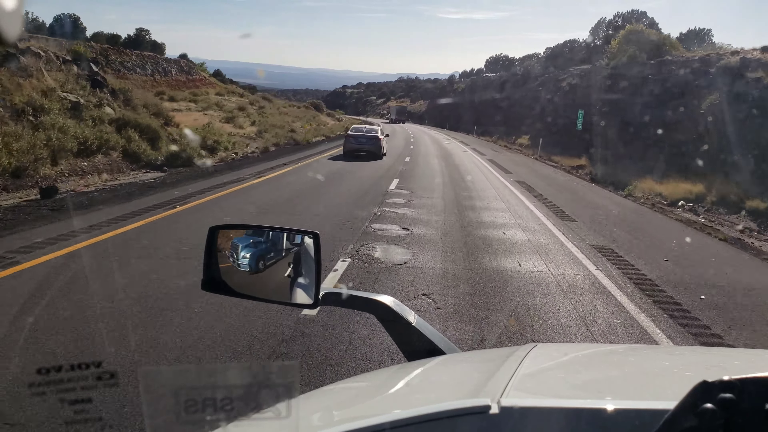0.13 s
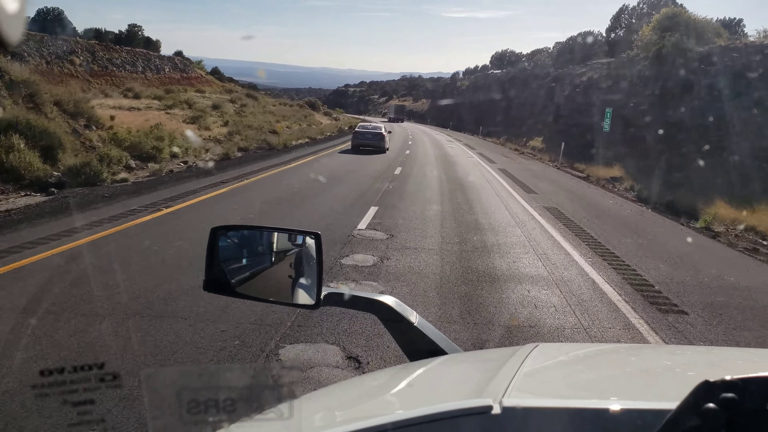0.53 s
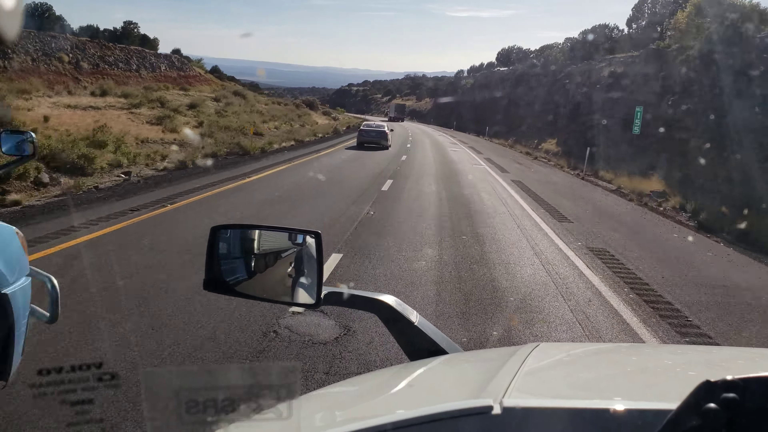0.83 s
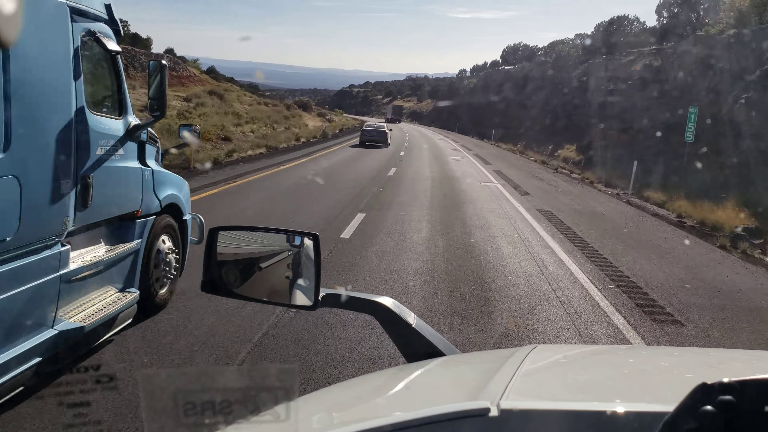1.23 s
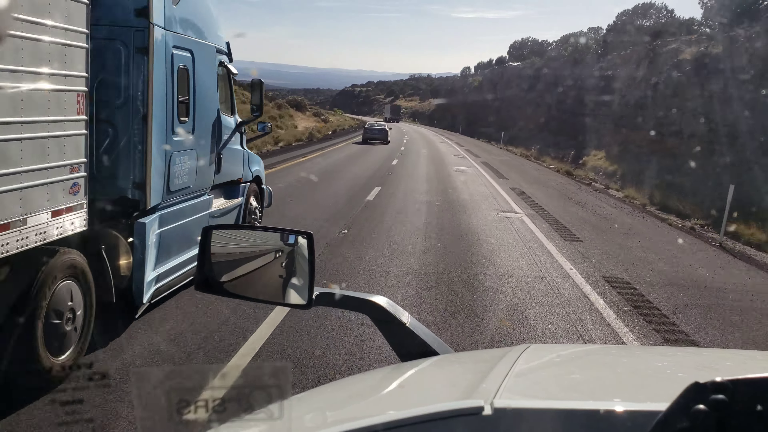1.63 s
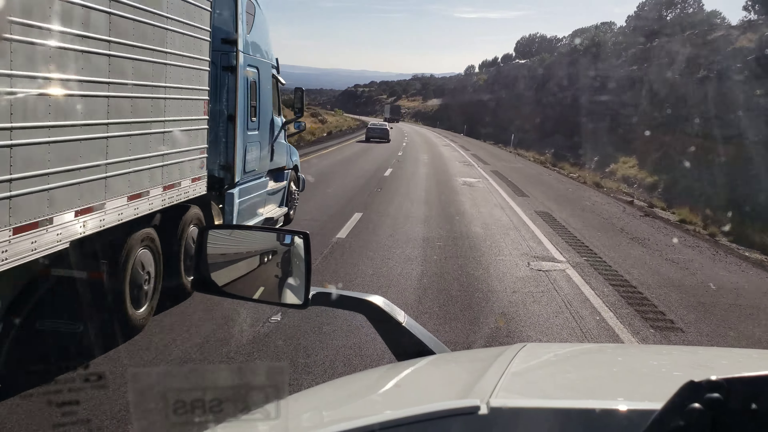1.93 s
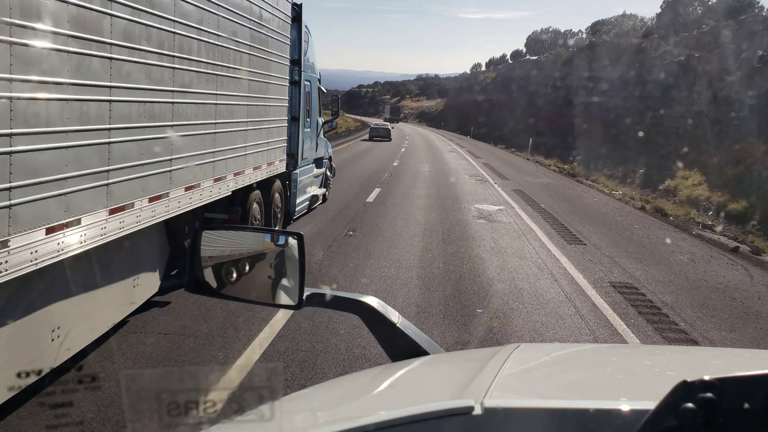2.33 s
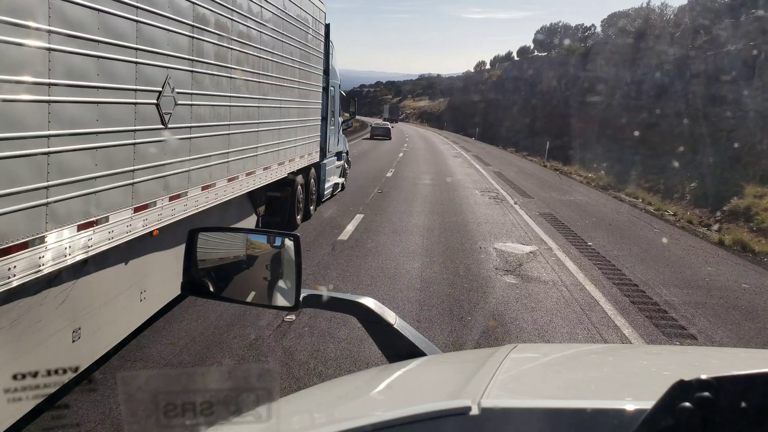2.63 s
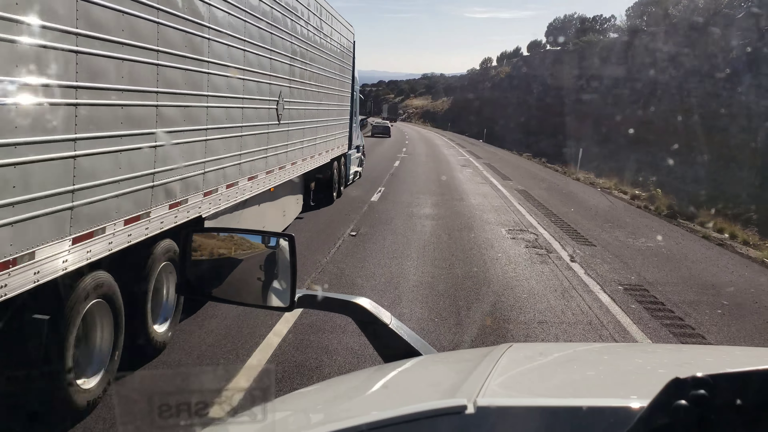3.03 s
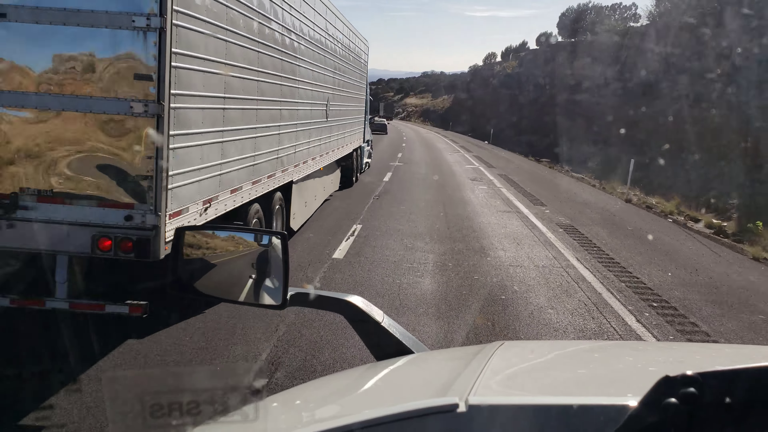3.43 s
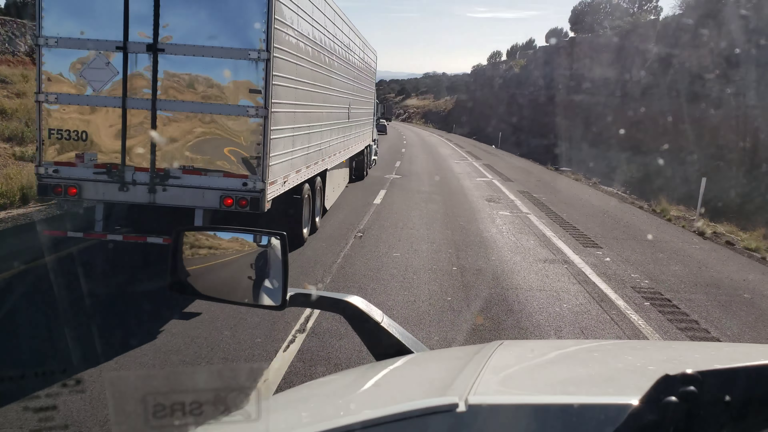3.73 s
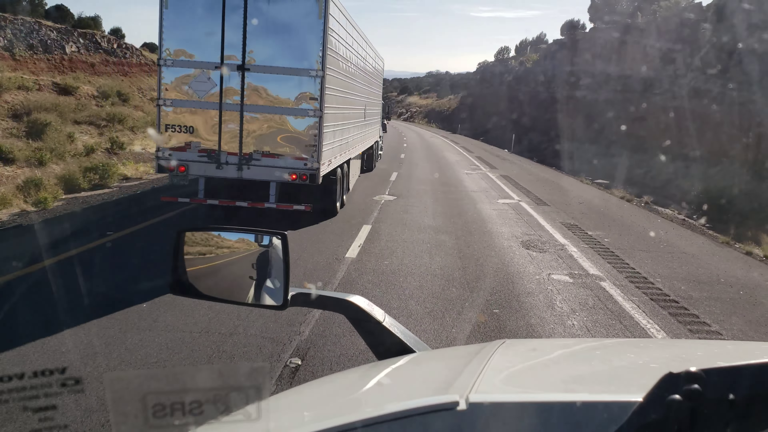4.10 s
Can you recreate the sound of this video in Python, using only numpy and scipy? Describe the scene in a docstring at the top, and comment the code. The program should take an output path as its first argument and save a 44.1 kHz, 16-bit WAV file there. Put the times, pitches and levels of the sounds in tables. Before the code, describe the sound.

A steady diesel drone and deep road rumble fill a truck cab, heard from inside, with a close turn signal clicking in a slightly limping rhythm. Early on, the tyres of a passing truck hum briefly to the left, followed by tiny trim squeaks. Later the floor rumbles over rough patches, and gusts of air grow stronger toward the end, hissing and buffeting the door amid light plastic taps.

```python
"""Inside the cab of a diesel truck holding its speed downhill on the engine brake.
The engine drones and booms in the cab's air resonance; tyres rumble, rough road shakes the floor.
The turn signal's contact goes tick-tock and rings the dash; loose trim taps and squeaks a little.
Another truck overtakes: its tyres hum, its wake hisses and flutters at the seals and slaps the door."""
import sys
import numpy as np
from scipy import signal
from scipy.fft import rfft, irfft
from scipy.io import wavfile

SR = 44100
rng = np.random.default_rng(int(sys.argv[2]) if len(sys.argv) > 2 else 0)


def digitize_waveform(pressure):
    """Quantize a signal to 16-bit integers and store it at the path in sys.argv[1].

    Rows of a 2-D input are taken as channels; values are limited to [-1, 1].
    """
    field = np.atleast_2d(pressure).T
    bounded = np.clip(field, -1, 1)
    quanta = np.round(bounded * 32767).astype(np.int16)
    wavfile.write(sys.argv[1], SR, quanta)


N = 188025
TIME_S, BIN_HZ = np.arange(N) / SR, np.fft.rfftfreq(N, 1 / SR)

# spectrum of click snaps and trim scuffs: (frequency [Hz], relative density [dB])
SNAP_SPECTRUM = [(500, -3), (1000, -5), (1500, -1), (2600, 6.5), (3600, -0.5), (5400, -5), (6300, -18),
                 (9000, -32), (11000, -22), (15000, -36)]


def engine(cycle_hz=11.254, boom_order=4, boom_db=-21, surge_half_s=0.042):
    """Engine and driveline drone; the order that meets the cab's air resonance booms."""
    # (multiple of the cycle rate, rms level [dB])
    engine_orders = [(7, -37), (8, -40), (12, -36), (16, -40.5), (17, -50), (18, -44.5)]
    # road and air jolts swell or sag the boom: (time [s], gain [dB])
    surges = [(.14, 2), (.83, 3.5), (2.67, 4), (3.85, -5), (3.97, 6.5)]
    # (time [s], shaft rate [Hz])
    shaft_speed = [(0, 57.66), (.6, 57.24), (1.4, 57.13), (2.3, 56.42), (3.3, 55.8), (4.26, 56.23)]
    # (multiple of the shaft rate, rms level [dB])
    shaft_orders = [(1, -31), (2, -31.5), (5, -42.5)]
    rate_hz = np.full(N, cycle_hz)
    shaft_hz = np.interp(TIME_S, *np.transpose(shaft_speed))
    surge_db = sum(db * bell(s, surge_half_s) for s, db in surges)
    boom = hum(rate_hz, [(boom_order, boom_db + surge_db)], flutter_db=0.6, wander_rad=0.31)
    drone = hum(rate_hz, engine_orders, flutter_db=3, wander_rad=0.21)
    driveline = hum(shaft_hz, shaft_orders, flutter_db=0, wander_rad=0.3)
    return (boom + drone + driveline) * pan(0.63)


def road(rumble_db=-23.5, rush_db=-45, bump_db=0.65, wall_cutoff_hz=1700):
    """Tyre rumble through the cab walls, road-driven cab resonances, steady air rush."""
    # (frequency [Hz], relative density [dB])
    rumble_spectrum = [(20, -9.5), (32, -13), (41, -6), (60, -2.5), (90, 2), (125, -6), (150, -5),
                       (190, -2.5), (225, -7), (265, -13), (370, -18), (550, -16), (900, -25), (1500, -31)]
    rush_spectrum = [(700, -1), (1300, 7), (1900, 1.5), (2800, 1.5), (3800, -2.5), (5000, -10.5),
                     (6500, -18), (8500, -21.5), (11000, -35), (14500, -20)]
    # (frequency [Hz], right minus left [dB])
    balance = [(80, 2), (200, -0.5), (340, -3.5), (520, 0), (900, 2.5), (1400, -0.5)]
    # (frequency [Hz], width [Hz], rms level [dB])
    cab_modes = [(280.6, 22, -44), (348.6, 13, -45.5), (481.4, 15, -46.5), (1227, 215, -44.5)]
    walls = 1 / (1 + (BIN_HZ / wall_cutoff_hz) ** 6)
    lean = pan(on_bins(balance))
    rumble = cab_noise(from_db(on_bins(rumble_spectrum)) * walls * lean)
    rumble *= from_db(rumble_db + bump_db * drift(1.6))
    whines = sum(from_db(db) * cab_noise(resonance(hz, width) * lean) for hz, width, db in cab_modes)
    rush = from_db(rush_db) * cab_noise(from_db(on_bins(rush_spectrum)))
    return rumble + whines + rush


def floor():
    """Rough road shakes the floor's broad, dull resonance."""
    # (centre [s], rms level [dB], half length [s])
    rough_stretches = [(.75, -24.5, .22), (1.52, -29.5, 0.15), (2.69, -22.5, .08), (2.912, -19, 0.054),
                       (3.446, -25.5, 0.14), (3.87, -22.5, 0.15), (4.176, -21, 0.087)]
    shake = sum(from_db(db) * bell(s, half_s) for s, db, half_s in rough_stretches)
    return shake * cab_noise(resonance(centre_hz=70.2, width_hz=82) ** 2)


def turn_signal(first_s=0.1316, tock_gain_db=-3):
    """Lamp on (tick) and lamp off (tock) alternate in a limping rhythm."""
    # dash modes: (frequency [Hz], relative level [dB], right minus left [dB])
    tick_modes = [(614, -29.5, 7), (757, -26, 13.5), (898, -24.5, 4.5), (1085, -26, -2), (1898, -37, 14.5),
                  (2102, -28.5, 8.5), (2443, -30, 10), (2615, -24, -1), (3000, -50, 7), (2980, -56, 1),
                  (3276, -42, 6), (3470, -33, 3), (3700, -43, -1), (4140, -44, 10), (4530, -53.5, 1),
                  (4690, -47.5, 7), (4980, -55, 5), (5560, -45, 17), (7160, -52, 6), (8650, -58, 8),
                  (10100, -52.5, 11)]
    tock_modes = [(1070, -28.5, -3), (1210, -45, -1), (1740, -41.5, 8), (2030, -23.5, 5.5),
                  (2675, -14, 4.5), (2914, -33, -11), (2966, -25.5, -3), (3227, -36, -4), (3510, -25, 5),
                  (3750, -36, -10), (4330, -38, 3), (4480, -39, 9), (4950, -31.5, 3), (5120, -34, 5),
                  (5900, -50, 3), (10100, -48.5, 11), (10780, -56, 8), (11509, -52, 11)]
    # repeating round: (gap [s])
    gaps_s = (.32, .28, .36)
    times_s = first_s + np.cumsum([0, *np.tile(gaps_s, N // SR + 1)])
    times_s = times_s[times_s < N / SR]
    ticks = contact_clicks(times_s[::2], tick_modes, ring_rise_s=0.0037, lag_s=0.0022,
                           touch_db=-36, snap_db=-32, snap_rise_s=0.0083, crack_db=-60)
    tocks = contact_clicks(times_s[1::2], tock_modes, ring_rise_s=0.0034, lag_s=0.001408,
                           touch_db=-35, snap_db=-31, snap_rise_s=0.0088, crack_db=-49)
    return ticks + from_db(tock_gain_db) * tocks


def contact_clicks(times_s, modes, ring_rise_s, lag_s, touch_db, snap_db, snap_rise_s, crack_db):
    """One click, repeated: the contact touches lightly, then cracks, snaps and rings the dash."""
    t = np.arange(SR // 20) / SR
    lagged_s = t - lag_s
    contact = from_db(touch_db) * swell(t, rise_s=0.0011) + from_db(snap_db) * swell(t, snap_rise_s)
    click = cab_noise(from_db(on_bins(SNAP_SPECTRUM)))[:, :len(t)] * contact
    crack = cab_noise(resonance(centre_hz=12000, width_hz=4500))[:, :len(t)]
    click += from_db(crack_db) * crack * swell(lagged_s, rise_s=0.0027)
    ear_phase_rad = np.array([[-0.82], [0.82]])   # right ear is nearer
    for k, (hz, db, right_db) in enumerate(modes):
        ring = swell(lagged_s, ring_rise_s) * np.sin(2 * np.pi * hz * lagged_s + ear_phase_rad)
        click += (-1) ** k * from_db(db) * pan(right_db) * ring   # neighbouring modes swing oppositely
    impulses = np.zeros((1, N))
    impulses[0, (times_s * SR).astype(int)] = 1
    return signal.fftconvolve(impulses, click, axes=1)[:, :N]


def gusts(release_s=0.18):
    """Draught above calm in dB: each gust builds, holds and dies away."""
    # (start [s], attack [s], hold [s], gain [dB])
    gust_events = [(-.1, 0.083, .04, 3), (0.868, 0.042, 0.19, 2.5), (3.2, 0.1, .26, 3),
                   (3.795, 0.017, .5, 6), (3.87, 0.086, .3, 5)]
    gust_db = 0
    for start_s, attack_s, hold_s, db in gust_events:
        attack = np.clip((TIME_S - start_s) / attack_s, 0, 1)
        release = np.exp(-np.maximum(TIME_S - start_s - attack_s - hold_s, 0) / release_s)
        gust_db += db * attack * release
    return gust_db


def seals(gust_db, calm_db=-51, flutter_db=1.27, calm_spurts_per_s=6, spurt_power=2.3, spurt_db=-1.5):
    """Air leaks past the door seals in turbulent puffs; gusts bring more sharp spurts."""
    # hiss per ear: (frequency [Hz], relative density [dB])
    left_spectrum = [(1000, -3), (2200, 4), (4000, 10.5), (5200, 7.5), (6500, 4.5), (7600, 3), (8600, 0),
                     (10500, -1), (13000, 2.5), (15500, -5)]
    right_spectrum = [(1000, 4.5), (2200, 13), (4000, 10), (5000, 10), (5900, 8.5), (7200, 13.5),
                      (8600, -3.5), (10500, 1.5), (13500, 5.5), (15500, 4)]
    hiss = cab_noise(from_db([on_bins(left_spectrum), on_bins(right_spectrum)]))
    onsets = rng.random(N) < calm_spurts_per_s * from_db(spurt_power * gust_db) / SR
    spurt = swell(np.arange(SR // 50) / SR, rise_s=0.00053)
    spurts = signal.fftconvolve(onsets.astype(float), spurt)[:N]
    level_db = calm_db + gust_db + flutter_db * drift(35)
    return hiss * from_db(level_db) * (1 + from_db(spurt_db) * spurts)


def door(gust_db, calm_db=-45):
    """Gusts drum on the door panel with a dull roar; wake eddies slap it."""
    # (centre [s], rms level [dB], half length [s])
    wake_slaps = [(4.01, -33, 0.051), (4.26, -33, .04)]
    roar = from_db(calm_db + gust_db) * cab_noise(resonance(centre_hz=400, width_hz=400))
    slaps = sum(from_db(db) * bell(s, half_s) for s, db, half_s in wake_slaps)
    return roar + slaps * cab_noise(resonance(centre_hz=480, width_hz=490))


def overtaker(tyre_hz=402.4, fall_hz_per_s=7.04, pass_half_s=0.095):
    """The other truck's tyre hum at the left window swells with each axle and sinks in pitch."""
    # (passing time [s], rms level [dB])
    axles = [(1.0, -37.5), (1.29, -35)]
    pitch_hz = tyre_hz - fall_hz_per_s * (TIME_S - axles[0][0])
    nearness = sum(from_db(db) * bell(s, pass_half_s) for s, db in axles)
    return nearness * hum(pitch_hz, [(1, 0)], flutter_db=1.5, wander_rad=0.24) * pan(-2.7)


def trim_taps(width_share=0.19):
    """Loose plastic trim taps: a narrow ring over a broad scuff."""
    # (start [s], level [dB], ring [Hz], rise [s])
    taps = [(0.961, -47, 3950, .005), (0.971, -47, 12500, 0.0033), (3.277, -46, 12500, 0.002),
            (3.297, -39.5, 3885, 0.004), (3.372, -41.5, 4300, 0.0044), (3.459, -50, 12500, 0.0016),
            (3.808, -46, 12500, .003), (3.916, -40, 3900, .003), (3.935, -38.5, 10200, 0.0028),
            (3.937, -37, 6670, 0.0044), (3.977, -39, 12000, .003), (4.029, -33, 4080, 0.0025),
            (4.032, -34.5, 2270, .005), (4.054, -35, 12800, 0.0042), (4.092, -35, 4040, 0.0025)]
    scuff = cab_noise(from_db(on_bins(SNAP_SPECTRUM)))
    out = 0
    for start_s, db, hz, rise_s in taps:
        ring = cab_noise(resonance(hz, width_share * hz))
        out += from_db(db) * swell(TIME_S - start_s, rise_s) * (ring + scuff)
    return out


def trim_squeaks(sag_share=0.013, rasp_share=0.05):
    """Trim sticks and slips: short raspy chirps that sag in pitch."""
    # (peak time [s], rms level [dB], pitch [Hz], half length [s])
    chirps = [(1.335, -48, 4030, .005), (1.364, -45.5, 4120, 0.012), (1.463, -51, 4200, 0.014),
              (1.536, -48, 4020, 0.0076), (1.557, -50, 4250, 0.0097), (1.578, -43, 4060, .009)]
    out = 0
    for peak_s, db, hz, half_s in chirps:
        progress = np.clip((TIME_S - peak_s) / half_s, -6, 6)
        pitch_hz = hz * (1 - sag_share * progress + rasp_share * drift(700))
        phase = 2 * np.pi * np.cumsum(pitch_hz) / SR + rng.uniform(0, np.pi / 2, (2, 1))
        out += from_db(db) * np.exp(-progress ** 2) * np.sqrt(2) * np.sin(phase)
    return out


def cab_echoes(x, echo_db=-10, first_echo_s=0.00418, t60_s=0.085):
    """Adds dense, short reflections from glass and panels."""
    t = np.arange(SR // 6) / SR
    echoes = rng.standard_normal((2, len(t))) * from_db(-60 * t / t60_s) * (t > first_echo_s)
    echoes /= np.sqrt(np.sum(echoes ** 2, axis=1, keepdims=True))
    return x + from_db(echo_db) * signal.fftconvolve(x, echoes, axes=1)[:, :N]


def hum(rate_hz, partials, flutter_db, wander_rad):
    """Partials of a rotating part, each wavering on its own in level and phase."""
    angle = 2 * np.pi * np.cumsum(rate_hz) / SR
    out = 0
    for order, db in partials:
        phase = order * angle + rng.uniform(0, 2 * np.pi) + wander_rad * drift(3.8)
        out += from_db(db + flutter_db * drift(3.1)) * np.sin(phase)
    return np.sqrt(2) * out


def cab_noise(bin_gain):
    """Coloured stereo noise, rms 1, alike in both ears only in the bass."""
    # (frequency [Hz], left-right correlation)
    ear_correlation = [(40, 0.93), (130, 1), (300, 0.89), (430, 0.61), (620, -0.32), (850, 0.47),
                       (1100, -0.26), (1300, -0.54), (1700, -0.13), (4000, -0.034)]
    mid, side = rfft(rng.standard_normal((2, N)))
    alike = np.clip(on_bins(ear_correlation), -0.999, 0.999)
    ears = np.sqrt(1 + alike) * mid + np.sqrt(1 - alike) * side * [[1], [-1]]
    return rms_one(irfft(bin_gain * ears, N))


def drift(rate_hz):
    """Random wander below about rate_hz, rms 1."""
    return rms_one(irfft(rfft(rng.standard_normal(N)) / (1 + (BIN_HZ / rate_hz) ** 2), N))


def resonance(centre_hz, width_hz):
    """Gain of a resonance per FFT bin."""
    return 1 / (1 + (2 * (BIN_HZ - centre_hz) / width_hz) ** 2)


def on_bins(points):
    """Table interpolated over log frequency, per FFT bin."""
    hz, value = np.transpose(points)
    return np.interp(np.log(BIN_HZ + 1e-9), np.log(hz), value)


def swell(t, rise_s):
    """Envelope: reaches 1 at rise_s, then decays."""
    u = np.maximum(t, 0) / rise_s
    return (u * np.exp(1 - u)) ** 2


def bell(centre_s, half_s):
    """Gaussian envelope, peak 1."""
    return np.exp(-((TIME_S - centre_s) / half_s) ** 2)


def pan(right_db):
    """Left and right gains."""
    return from_db(np.array([[-0.5], [0.5]]) * right_db)


def from_db(db):
    """Decibels to gain."""
    return 10 ** (np.asarray(db) / 20)


def rms_one(x):
    """Scale to rms 1."""
    return x / np.sqrt(np.mean(x ** 2) + 1e-20)


def scene(buffet_share=0.1, soften_share=0.14):
    """Engine, road, air and dash; gusts also shake the cab, and the clicks soften under them."""
    gust_db = gusts()
    clicks = turn_signal() * from_db(-soften_share * gust_db)
    road_and_air = road() * from_db(buffet_share * gust_db) + seals(gust_db) + door(gust_db)
    outside = engine() + floor() + overtaker() + road_and_air
    return outside + cab_echoes(clicks + trim_taps() + trim_squeaks())


def record(dry):
    """Steep low-pass at 15.6 kHz."""
    return signal.sosfilt(signal.ellip(12, 0.1, 80, 15600, fs=SR, output="sos"), dry)


dry = scene()
out = record(dry)
digitize_waveform(out)
```